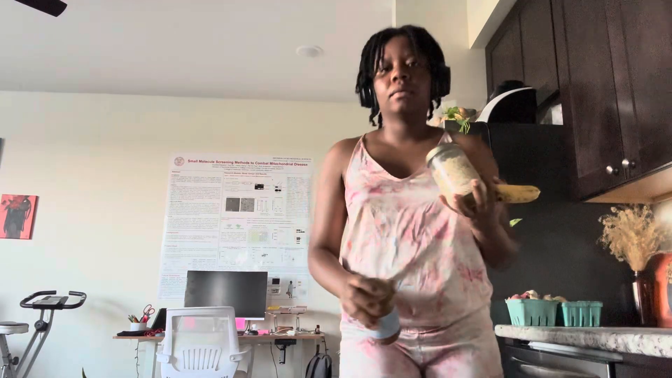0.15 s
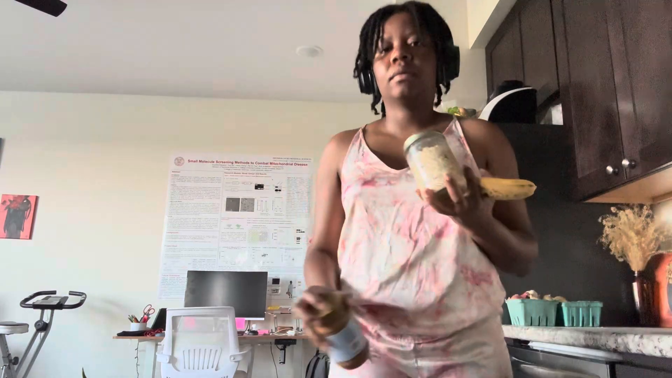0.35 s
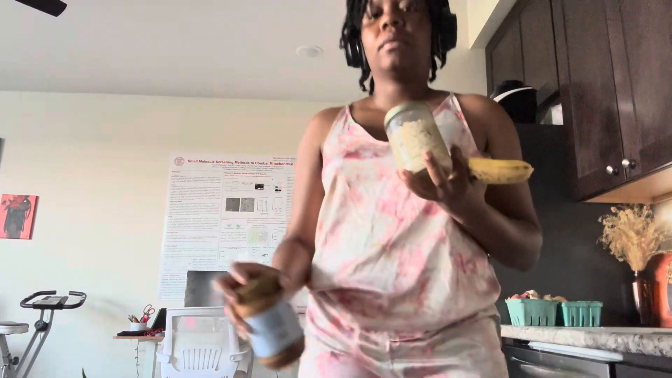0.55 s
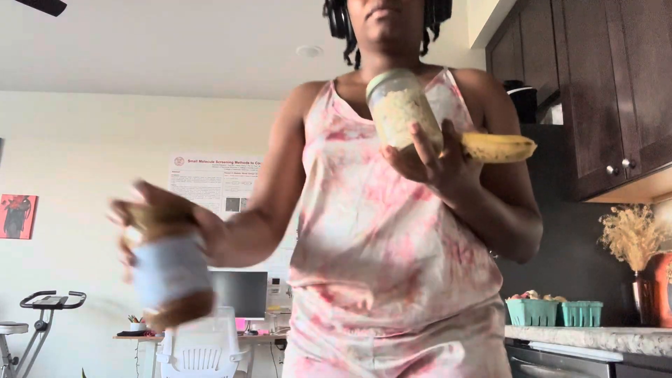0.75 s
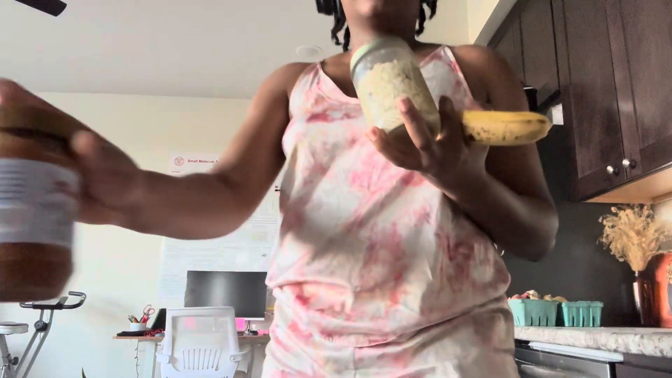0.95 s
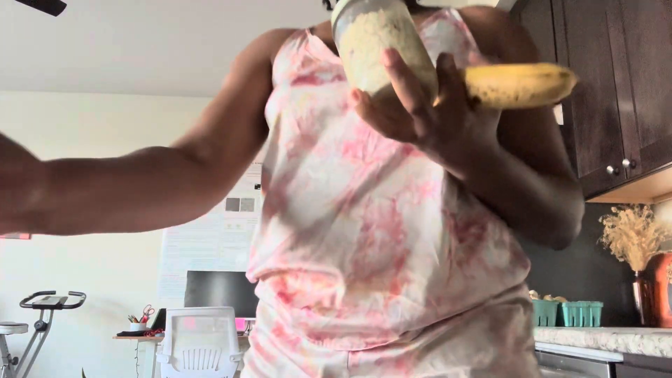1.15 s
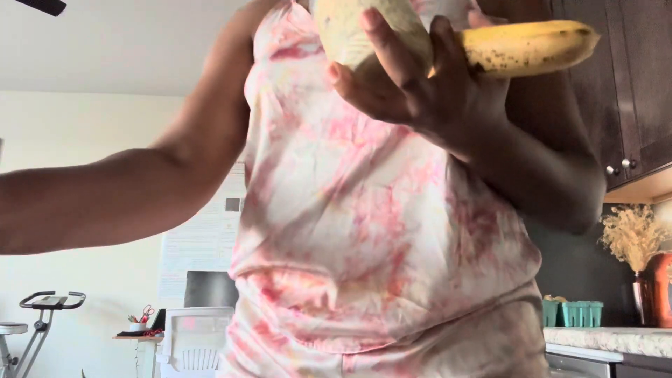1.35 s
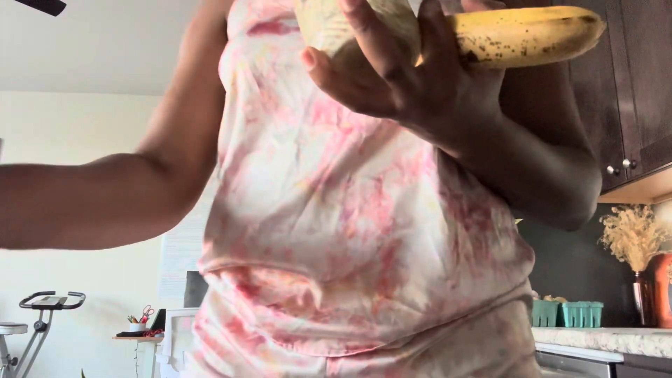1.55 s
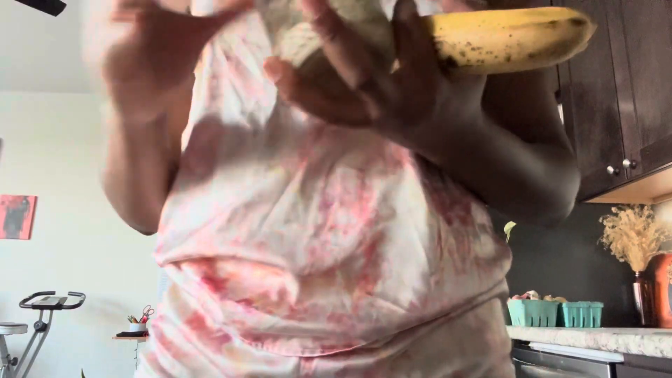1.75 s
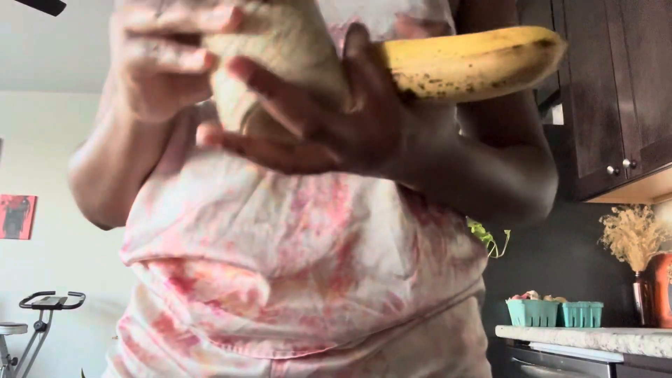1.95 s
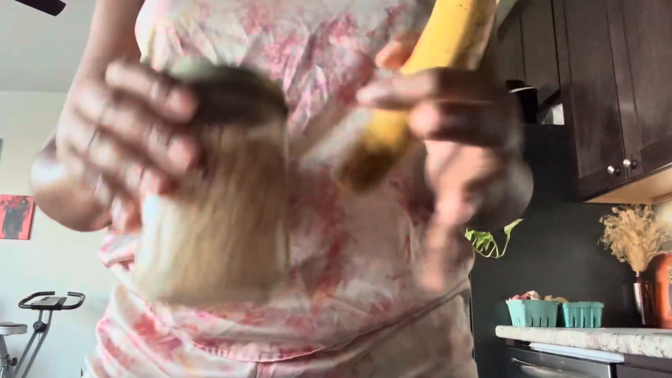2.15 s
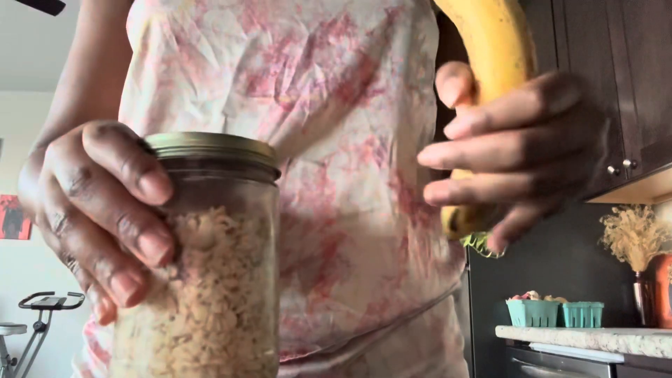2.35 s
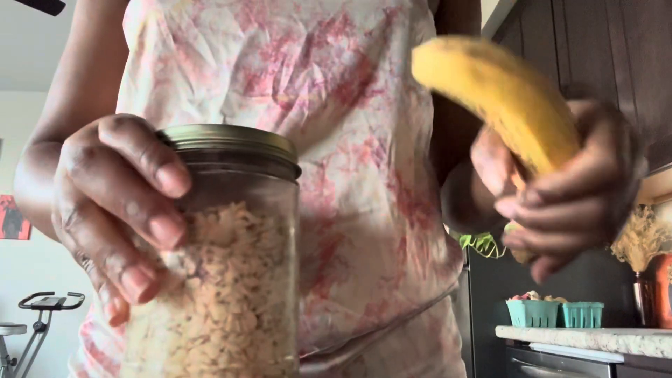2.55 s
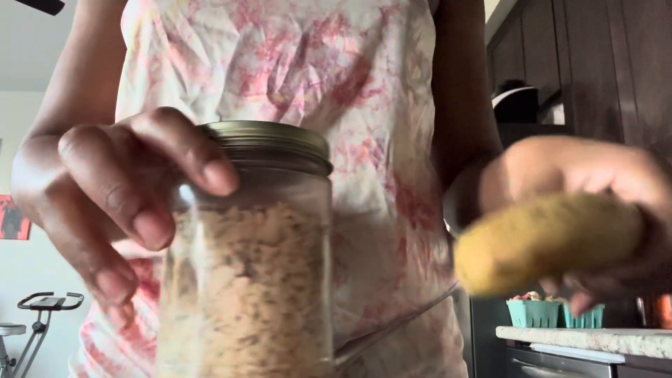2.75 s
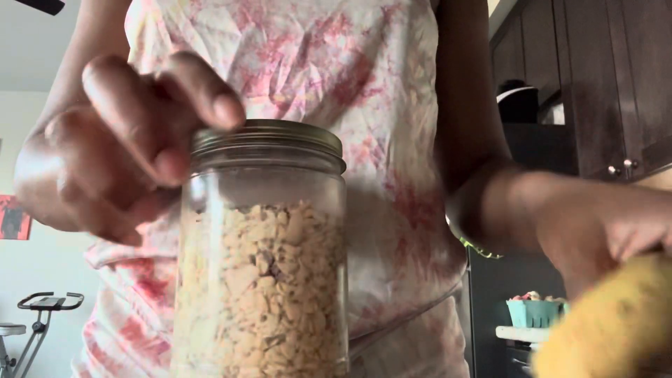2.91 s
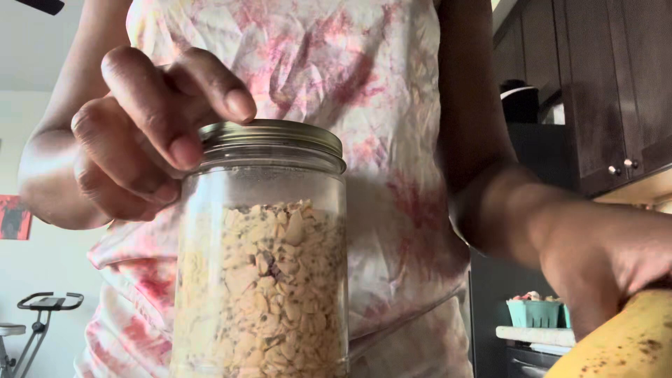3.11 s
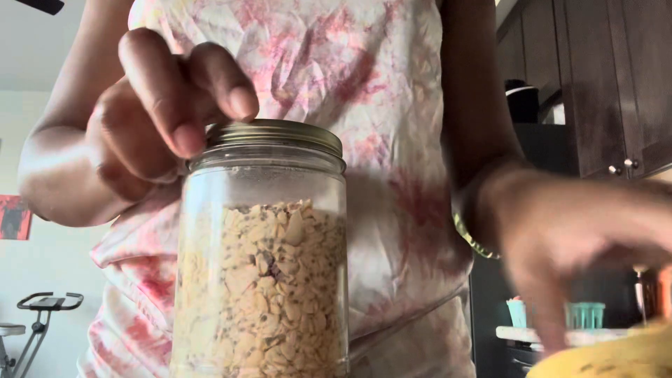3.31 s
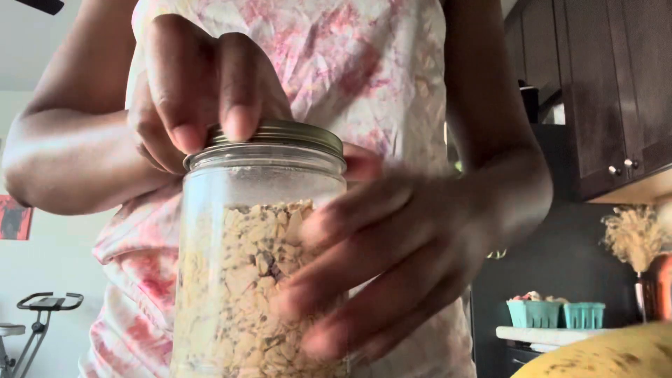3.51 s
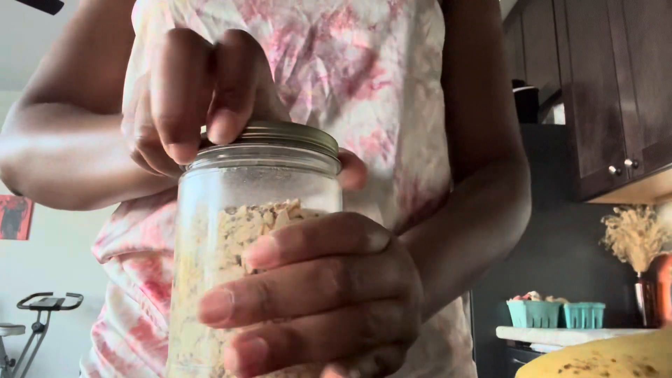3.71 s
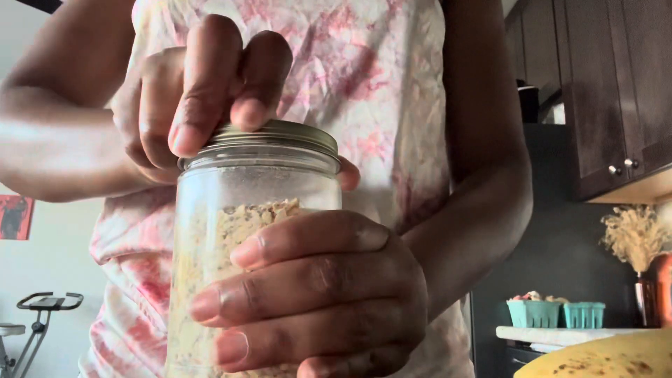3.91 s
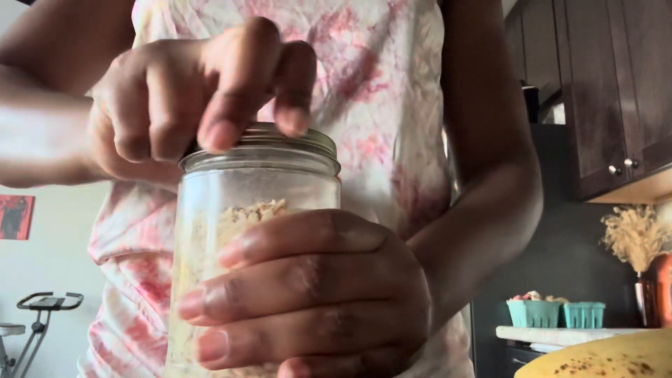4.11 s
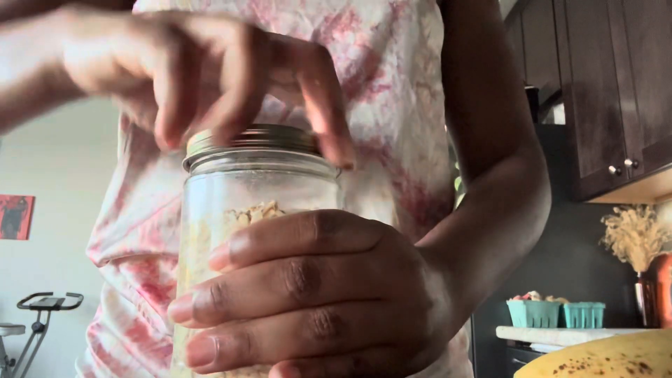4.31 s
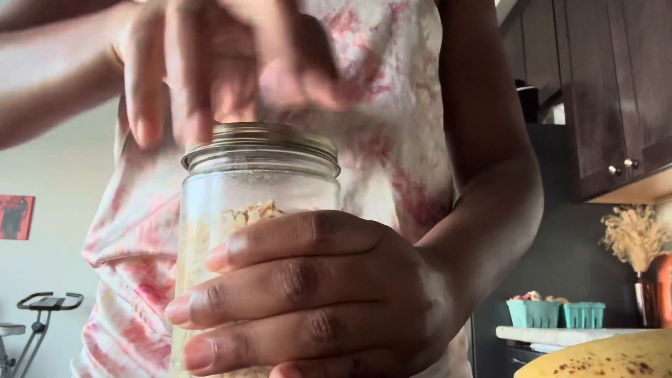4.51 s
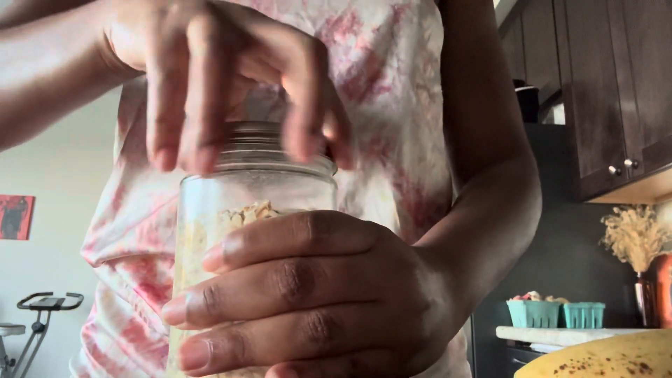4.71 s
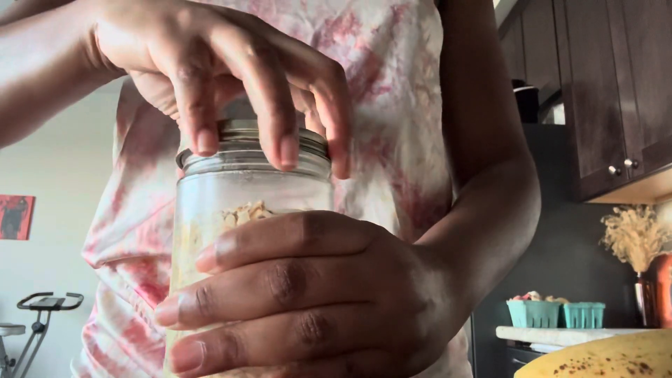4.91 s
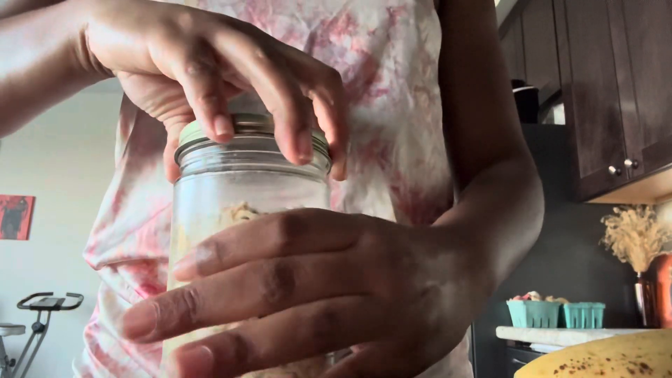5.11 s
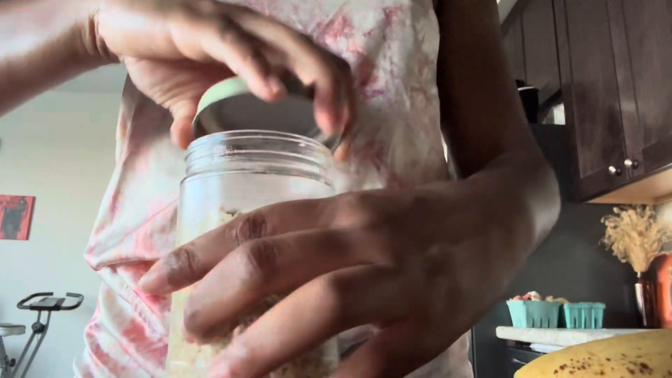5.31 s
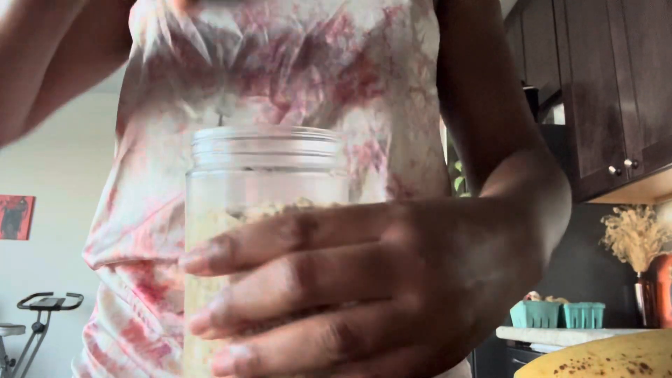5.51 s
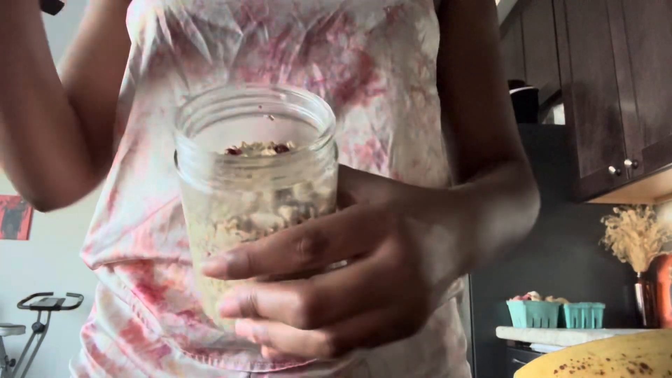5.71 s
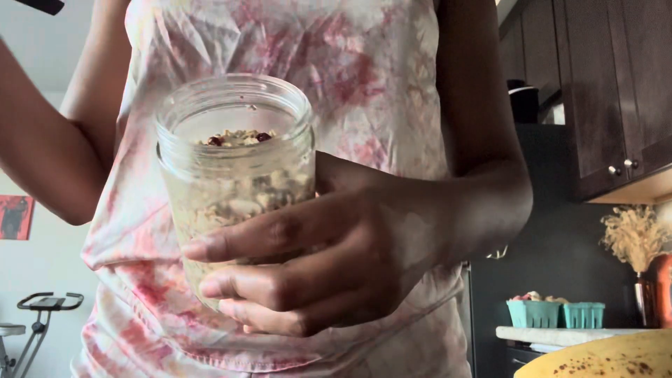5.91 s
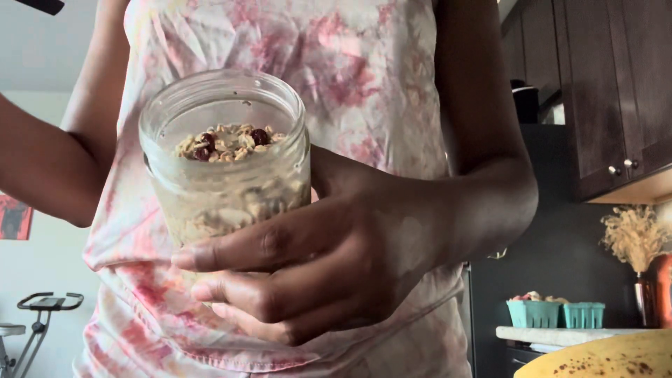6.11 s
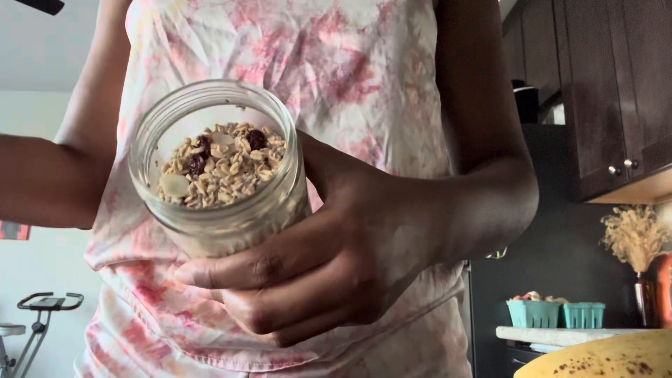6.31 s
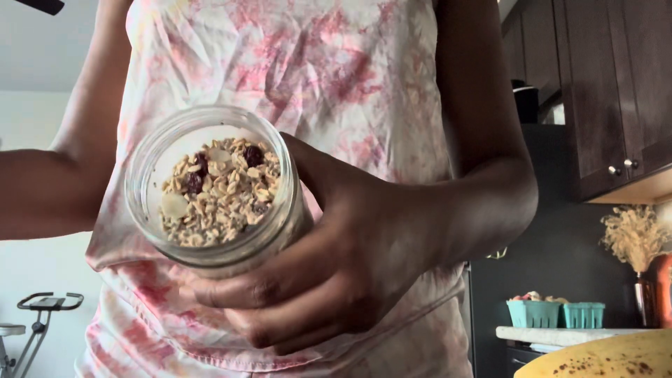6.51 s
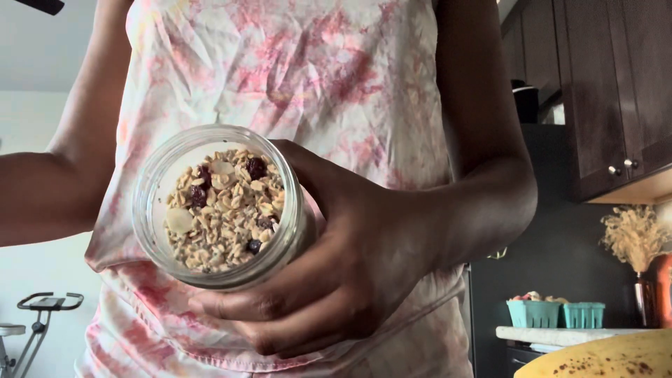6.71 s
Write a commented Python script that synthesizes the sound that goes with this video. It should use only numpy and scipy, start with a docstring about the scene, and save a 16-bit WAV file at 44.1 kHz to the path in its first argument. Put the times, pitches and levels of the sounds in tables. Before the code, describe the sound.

In a quiet, faintly humming kitchen, two jars are set down in turn and a metal screw lid grinds, squeaks and clacks free.

```python
"""A hum swells faintly in a quiet, rather live kitchen and clothes rustle; then two jars are set down on a table.
The full plastic jar lands with a thump and a thin rattle; the glass one rocks twice before it stands.
Fingers take hold of the glass jar's metal lid and twist it off in short pushes: random slips ring the lid
as a grinding thread, wavering tones squawk, and short bursts ring the lid and the glass as it clacks free.
Blows drive banks of resonances; cloth and air are shaped noise. A phone lying on the table hears it all."""
import sys
import numpy as np
from scipy import signal
from scipy.fft import rfft, irfft
from scipy.io import wavfile
from scipy.ndimage import uniform_filter1d, map_coordinates

SR = 44100
rng = np.random.default_rng(int(sys.argv[2]) if len(sys.argv) > 2 else 0)


def to_wav(sig):
    """Store sig (one row per channel, or 1-D mono) as 16-bit WAV at the path in sys.argv[1].

    Samples outside -1..1 are clipped; the rate is SR.
    """
    pcm = np.clip(np.atleast_2d(sig), -1, 1) * 32767
    pcm = np.round(pcm).astype(np.int16)
    wavfile.write(sys.argv[1], SR, pcm.T)  # frames by channels


N = 297675  # 6.75 s


# pushes of the fingers that turn the lid and draw it off:
# start_s, attack_s, hold_s, grind_db, rasp_db, rim_hiss_db
PUSHES = [(3.995, .008, .04, -36, -44, -58), (4.075, .025, .07, -37.5, -42, -53),
          (4.19, .045, .05, -27.5, -35, -53), (4.27, .015, .045, -32, -39, -46),
          (4.558, .018, .025, -37, -54, -56), (4.628, .014, .022, -29, -28.5, -40),
          (4.655, .02, .05, -26, -31, -46), (4.712, .02, .02, -28, -34, -38),
          (4.78, .02, .2, -46, -62, -72), (4.93, .03, .046, -34, -48, -62),
          (5.089, .015, .02, -36, -49, -58), (5.136, .02, .07, -32, -42, -52),
          (5.445, .02, .025, -40, -37.5, -70)]
# noise spectrum of the rim's hiss: frequency_hz, level_db (per Hz)
HISS = [(600, -28), (1500, -3), (2200, 1), (3400, -5), (5400, -5), (6600, -7), (9600, -0.5), (13600, -9),
        (14700, -42.5)]
# every push tires as it goes on: its level sags, then the thread stops
PUSH_SAG_DB, PUSH_RELEASE_S = 3, .03


def twisting(uneven_db=2.2):
    """Stick-slip in the thread drives the lid's low resonances, grit rasps on its upper ones, the rim hisses."""
    grind_gain, rasp_gain, hiss_gain = 0, 0, 0
    for s, attack_s, hold_s, grind_db, rasp_db, hiss_db in PUSHES:
        push = stroke(s, attack_s, hold_s, PUSH_RELEASE_S, PUSH_SAG_DB)
        # overlapping pushes add as powers
        grind_gain = np.hypot(grind_gain, undb(grind_db) * push)
        rasp_gain = np.hypot(rasp_gain, undb(rasp_db) * push)
        hiss_gain = np.hypot(hiss_gain, undb(hiss_db) * push)
    grip = undb(uneven_db * unit(soften(rng.standard_normal(N), 60)))

    low_slips = soften(scraped(rate=800, spread_db=3), 92, "high")
    grind = unit(soften(low_slips, 1090, order=3)) * grind_gain
    grit = soften(scraped(rate=1200, spread_db=3.8), 1050, "high", order=4)
    rasp = unit(soften(grit, 2700)) * rasp_gain
    hiss = unit(colour(grains(9000, 3.5), HISS)) * hiss_gain
    return grip * (grind + rasp) + hiss + squawks()


# the thread squawks where it sticks and slips fastest: start_s, hold_s, pitch_hz (slips a second), level_db
SQUAWKS = [(4.193, .04, 790, -24), (4.635, .045, 660, -23.5), (4.93, .035, 700, -34),
           (5.135, .05, 680, -33)]
# a squawk swells, then drops in pitch as the lid stalls; the share is the drop at full stall
SQUAWK_ATTACK_S, SQUAWK_RELEASE_S, SQUAWK_DROP_SHARE = .035, .04, .55


def squawks(width_hz=80):
    """The thread sticks and slips hundreds of times a second, in uneven fits, slowing as each turn stalls."""
    t, out = np.arange(N) / SR, 0
    for s, hold_s, hz, db in SQUAWKS:
        # the cube keeps the pitch nearly steady at first
        stall = np.clip((t - s) / (hold_s + SQUAWK_RELEASE_S), 0, 1) ** 3
        phase = 2 * np.pi * np.cumsum(hz * (1 - SQUAWK_DROP_SHARE * stall)) / SR
        # slow complex noise wanders in both strength and phase
        fits = soften(rng.standard_normal(N) + 1j * rng.standard_normal(N), width_hz)
        slips = np.sqrt(np.abs(fits)) * np.sin(phase + np.angle(fits))
        swell = stroke(s, SQUAWK_ATTACK_S, hold_s, SQUAWK_RELEASE_S)
        out = out + undb(db) * unit(slips) * swell
    return out


def scraped(rate, spread_db, bend_share=.028, bend_hz=12):
    """A stream of slips rings the lid; its tone changes as it loosens and wavers as the fingers bend it."""
    slips, loose = grains(rate, spread_db), looseness(np.arange(N) / SR)
    tight_ring = unit(ring(slips, lid_modes(0)))
    loose_ring = unit(ring(slips, lid_modes(1)))
    lid = (1 - loose) * tight_ring + loose * loose_ring
    # reading the sound at an uneven speed bends its pitch
    bend = bend_share * unit(soften(rng.standard_normal(N), bend_hz))
    return map_coordinates(lid, [np.cumsum(1 + bend)], mode="mirror")


# the metal lid's resonances: frequency_hz, width_hz, tight_level_db, loose_level_db
LID = [(345, 55, 1, 4.5), (460, 170, -1, 0), (583, 35, -2, 4), (636, 55, 1, 6), (697, 45, -1, 1),
       (790, 45, 6, 1), (900, 120, -3, -7), (1110, 130, -6, -7), (1350, 220, -12, -9),
       (1910, 240, -13, -15), (2270, 160, -18, -14), (2765, 220, -25, -17), (4250, 500, -37, -32)]


def lid_modes(loose):
    """The lid's resonances, from tight on the thread (0) to loose (1)."""
    return [(hz, width, tight_db + loose * (loose_db - tight_db)) for hz, width, tight_db, loose_db in LID]


# the thread lets go between these times: start_s, end_s
LOOSENS_S = [4.25, 4.62]


def looseness(s):
    """How far the lid has come loose at time s, 0 to 1."""
    return np.interp(s, LOOSENS_S, [0, 1])


# the lid jolting on the glass thread: start_s, ring_db, contact_cutoff_hz, glass_clack_db, table_thump_db
JOLTS = [(3.986, -28.5, 1480, -33, -35), (4.193, -26.5, 1100, -55, -52), (4.217, -25.5, 1200, -52, -55),
         (4.271, -33, 1200, -46, -46), (4.311, -27, 900, -35, -40), (4.562, -31.5, 750, -60, -35.5),
         (4.625, -33, 2000, -39, -41), (4.653, -18.5, 800, -49, -56), (4.690, -27, 800, -47, -47),
         (4.765, -30, 1000, -55, -51), (4.976, -30, 500, -54, -43), (5.01, -36, 600, -51, -41),
         (5.156, -32, 1400, -38, -60), (5.164, -20.5, 550, -22.5, -26), (5.195, -30, 905, -54, -55),
         (5.261, -28, 700, -30, -31)]
# the glass jar's resonances: frequency_hz, width_hz, level_db
JAR = [(330, 55, 8.5), (470, 110, 5), (614, 80, 6), (824, 90, 0), (1040, 110, 2), (1340, 140, -3),
       (1735, 100, 1), (2080, 160, -3), (2320, 130, -1), (2605, 100, -6), (2850, 140, -4), (3280, 160, -6),
       (4130, 300, -8), (5200, 900, -17), (9540, 4300, -24)]


def jolts(lid_damping=1.7, glass_damping=1.3):
    """The lid catches and jumps: it rings under the fingers, clacks on the glass and shakes the table."""
    out = np.zeros((2, N))
    for s, db, cutoff_hz, clack_db, thump_db in JOLTS:
        lid_body = touched(lid_modes(looseness(s)), scatter_db=3, damping=lid_damping)
        lid = loud(ring(contact(cutoff_hz, push=1.5, fade_ms=6), lid_body), db)
        glass_body = touched(JAR, scatter_db=3, damping=glass_damping)
        glass = struck(glass_body, 3800, push=0.7, crunch_ms=3.2, db=clack_db)
        add(out, s, soften(lid, 140, "high") + glass + thump(thump_db))
    return out


# the full plastic jar put down: clack_db, contact_cutoff_hz, table_thump_db, left_minus_right_db
SET_DOWN = (-20.5, 5500, -14.3, 3)
SET_DOWN_S = 1.28
# the plastic jar's resonances: frequency_hz, width_hz, level_db
PLASTIC = [(305, 65, 15), (455, 90, 11), (530, 70, 15), (850, 110, 3), (1190, 160, 1), (1730, 200, -6),
           (2100, 400, -9), (2850, 500, -7.5), (3780, 300, -7), (4750, 450, -16)]
# the plastic jar rattles thinly as it settles: start_s, level_db
RATTLES = [(1.287, -55), (1.314, -54)]
# the rattle's resonances: frequency_hz, width_hz, level_db
RATTLE = [(4750, 500, 0), (5200, 600, -5)]
# the other side of the glass base follows its landing at once:
# start_s, clack_db, contact_cutoff_hz, table_thump_db
FAR_EDGE = (2.2645, -29, 2200, -30)
# hands meeting the jar and the table:
# start_s, clack_db, contact_cutoff_hz, table_thump_db, left_minus_right_db
KNOCKS = [(0.347, -67, 1800, -38, -3), (1.418, -58, 500, -36, 0), (2.843, -35.5, 480, -41, 3),
          (2.918, -53, 1800, -39, -6), (3.099, -50, 2000, -53, -3), (3.158, -48.5, 2800, -56, -5),
          (3.215, -49, 600, -31.5, -6.5), (3.269, -54, 2000, -48, -4), (3.281, -55, 600, -33, -4.5),
          (3.404, -48, 700, -29.5, -5), (3.609, -42, 1100, -43, 2.5), (3.672, -42, 1780, -44.5, 0),
          (3.745, -50, 387, -46, 0)]
# a footfall, heel then toe, sways the table through the floor: start_s, level_db
FOOTFALL = [(.35, -36), (.421, -44.5)]
# a thump sways the table's frame a moment later
SWAY_LAG_S = .008
# each kind of blow: modes, scatter_db, damping, push, crunch_ms, sway_db (against its thump)
PLASTIC_BLOW = (PLASTIC, 1, 1, .3, 8, -26)
GLASS_BLOW = (JAR, 2.5, 1.2, 1, 3.4, -16)
HAND_BLOW = (JAR, 4, 1.5, .5, 5.5, -11.5)


def knocks():
    """Each knock rings a jar and the table under it, and sways the frame."""
    out = np.zeros((2, N))
    blows = [(PLASTIC_BLOW, SET_DOWN_S, *SET_DOWN)]
    blows += [(GLASS_BLOW, *row, 0) for row in rocking() + [FAR_EDGE]]
    blows += [(HAND_BLOW, *row) for row in KNOCKS]
    for blow, s, db, cutoff_hz, thump_db, pan_db in blows:
        modes, scatter_db, damping, push, crunch_ms, sway_db = blow
        clack = struck(touched(modes, scatter_db, damping), cutoff_hz, push, crunch_ms, db)
        add(out, s, clack, pan_db, lag_ms_per_db=.05)
        add(out, s, thump(thump_db), pan_db, lag_ms_per_db=0.27)
        add(out, s + SWAY_LAG_S, sway(thump_db + sway_db))
    for s, db in RATTLES:
        add(out, s, loud(ring(burst(4), RATTLE), db))
    for s, db in FOOTFALL:
        add(out, s, sway(db))
    return out


# the glass jar lands: start_s, clack_db, contact_cutoff_hz, table_thump_db
LANDING = (2.2497, -16.8, 4368, -17.5)
# then it rocks: each return comes sooner, weaker and duller
ROCK_S, ROCK_GAP_SHARE = .1091, .918  # first gap, and each gap against the one before
ROCK_LOSS_DB, ROCK_CUTOFF_SHARE = 5.2, .56  # change at each return
ROCK_THUMP_DB = -8.5  # against the clack: only a part of the weight falls on the table


def rocking(count=3):
    """The glass jar lands and rocks to rest: rows of start_s, clack_db, contact_cutoff_hz, table_thump_db."""
    s, db, cutoff_hz, _ = LANDING
    rows = [LANDING]
    for k in range(count - 1):
        s = s + ROCK_S * ROCK_GAP_SHARE ** k
        db = db - ROCK_LOSS_DB
        cutoff_hz = cutoff_hz * ROCK_CUTOFF_SHARE
        rows.append((s, db, cutoff_hz, db + ROCK_THUMP_DB))
    return rows


CRACK_DB = -13  # the bare crunch of the contact, against the ring that follows


def struck(modes, cutoff_hz, push, crunch_ms, db):
    """A body's ring together with the dry crack of the contact."""
    body = loud(ring(contact(cutoff_hz, push, crunch_ms), modes), db)
    crack = soften(contact(cutoff_hz, 0, crunch_ms), 3200, order=1)
    crack = soften(soften(crack, 4700, order=3), 350, "high")
    return body + loud(crack, db + CRACK_DB)


# the table top's resonances: frequency_hz, width_hz, level_db
TABLE = [(61, 5.9, -8.5), (110.7, 16, 3), (127, 20, 1.5), (163.6, 20, 2), (226.7, 57, -7), (293.2, 19, -9)]


def thump(db, swell_ms=4):
    """The table top takes up the weight over a few milliseconds and booms."""
    t = np.arange(SR // 2) / SR * 1000 / swell_ms
    boom = ring(soften(signal.unit_impulse(len(t)), 700), TABLE) * (1 - np.exp(-t ** 2))
    return loud(soften(boom, 45, "high"), db)


# the table frame's resonances: frequency_hz, width_hz, level_db
FRAME = [(44, 16, -7.5), (63.6, 8, 0.5), (80, 13, -3)]


def sway(db):
    """The table's frame wobbles deeply after a soft shove."""
    return loud(soften(ring(contact(83, push=2, fade_ms=10), FRAME), 130), db)


# glass sliding on the table and under the palm: start_s, hold_s, level_db
SLIDES = [(2.5, .05, -48), (2.68, .1, -50)]
SLIDE_ATTACK_S, SLIDE_RELEASE_S, SLIDE_SAG_DB = .025, .025, 3
# a fingertip rubs on after it lands: level against its knock, and how long it takes to lift
RUB_DB, RUB_HOLD_S, RUB_RELEASE_S = -15, .02, .11


def rubbing():
    """Random slips ring the glass as it slides under the palm and as fingertips rub on after they land."""
    drag = 0
    for s, hold_s, db in SLIDES:
        drag = drag + undb(db) * stroke(s, SLIDE_ATTACK_S, hold_s, SLIDE_RELEASE_S, SLIDE_SAG_DB)
    out = unit(soften(ring(grains(1300, 2.3), JAR), 1700)) * drag
    skin = ring(grains(3000, 2), JAR)
    for s, db, cutoff_hz, _, _ in KNOCKS:
        # only firm contacts rub brightly
        rub = unit(soften(soften(skin, 3 * cutoff_hz), 1500, "high", order=1))
        out = out + rub * undb(db + RUB_DB) * stroke(s, .008, RUB_HOLD_S, RUB_RELEASE_S)
    return out


# arm movements that stir the cloth: start_s, hold_s, level_db
REACHES = [(.27, .31, -67.5), (1.18, .28, -66), (2.5, 2.9, -77), (2.55, .2, -69), (3.15, .35, -69),
           (5.49, .02, -72)]
REACH_ATTACK_S, REACH_RELEASE_S, CLOTH_REST_DB = .13, .12, -85
# noise spectrum of the cloth: frequency_hz, level_db (per Hz)
CLOTH = [(300, -6.5), (1000, 4), (2700, 5), (6500, -7), (9500, 2), (13500, -5), (15000, -22.5)]
# small crisp ticks of nails, cloth and cereal: start_s, level_db, fade_ms
TICKS = [(1.496, -58, 5), (1.724, -60.5, 5.4), (1.794, -65, 45), (2.816, -62, 15), (3.673, -43.5, 2.3),
         (3.835, -59.5, 6.7), (4.267, -53.5, 6), (5.2, -53, 2.6), (6.108, -72, 9.3)]
# noise spectrum of the ticks: frequency_hz, level_db (per Hz)
CRISP = [(600, -28.5), (2000, -6), (4000, -12.5), (9800, -1), (12500, -5), (15500, -28)]


def handling(swell=.6, flutter_db=2):
    """Cloth rustles in small fits as the arms move, with a sharper tick now and then."""
    motion = undb(CLOTH_REST_DB)
    for s, hold_s, db in REACHES:
        motion = np.hypot(motion, undb(db) * stroke(s, REACH_ATTACK_S, hold_s, REACH_RELEASE_S))
    folds = undb(flutter_db * unit(soften(rng.standard_normal(N), 25)))
    rustle = unit(folds * colour(grains(2500, 3.5), CLOTH)) * motion
    out = np.tile(rustle, (2, 1))
    for s, db, fade_ms in TICKS:
        # longer ticks start more gently; the padding leaves room for the spectrum's spread ahead of the tick
        tick = np.pad(burst(fade_ms, swell=swell), (64, 0))
        add(out, s, loud(soften(colour(tick, CRISP), 500, "high"), db))
    return out


# the kitchen's reverberation: frequency_hz, decay_s (fall of 60 dB), level_db
ROOM = [(58.26, 0.86, -3.5), (162, 0.68, -5.5), (404.6, 0.69, -8.5), (970, 0.56, -7.5), (2660, 0.58, -10.5),
        (6000, 0.43, -7.5), (12000, .42, -14)]


def kitchen(radiated, echo_s=.0145, echo_db=-21, build_s=0.0057):
    """A wall answers, and the room rings on, longest in the bass."""
    # unrelated tails left and right, each band fading at its own pace
    t = np.arange(int(1.3 * SR)) / SR
    f = np.maximum(np.fft.rfftfreq(len(t), 1 / SR), 1)
    places = np.log([row[0] for row in ROOM])
    source = radiated.mean(axis=0)
    wet = []
    for _ in range(2):
        noise, tail = rfft(rng.standard_normal(len(t))), 0
        for share, (hz, t60, db) in zip(np.eye(len(ROOM)), ROOM):
            # each band overlaps its neighbours in a triangle
            band = irfft(noise * np.interp(np.log(f), places, share), len(t))
            fade = np.exp(-np.log(1000) * t / t60) * (1 - np.exp(-(t / build_s) ** 2))
            tail = tail + undb(db) * band * fade / np.linalg.norm(fade)
        tail[int(echo_s * SR)] += undb(echo_db)
        wet.append(signal.fftconvolve(source, tail)[:N])
    return np.array(wet)


# the hum swells and fades: time_s, level_db
HUM = [(0, -80), (1.15, -54), (2.1, -57.5), (5.6, -59.5), (6.3, -77), (6.52, -53), (6.75, -53)]
HUM_HZ = 279.5
# noise spectrum of the room air: frequency_hz, level_db (per Hz)
AIR = [(15, -22), (28, -7), (240, -5), (260, 1.5), (297, -8), (340, -1), (433, -14.5), (614, -9),
       (1250, -27), (1800, -44), (15500, -55)]
AIR_DB = -55.5  # of each air noise, before its share in the stereo mix


def background():
    """Dull room air, partly shared by both sides, and an appliance's slightly wavering hum."""
    left, right, both = (unit(colour(rng.standard_normal(N), AIR)) for _ in range(3))
    air = undb(AIR_DB) * (0.37 * both + 0.89 * np.array([left, right]))
    waver_hz = 0.92 * unit(soften(rng.standard_normal(N), 1.2))
    phase = 2 * np.pi * np.cumsum(HUM_HZ + waver_hz) / SR
    hum = np.sqrt(2) * np.sin(phase) * curve(HUM)
    return air + hum


# how the two microphones differ:
# frequency_hz, left_minus_right_db, lid_lead_rad, table_lead_rad (left's phase lead)
PORTS = [(300, -.5, 0.1, 0.1), (630, -4, -.4, 2.3), (850, -2, -.3, 1.9), (1200, 1.5, -.1, .9),
         (1900, 2.2, -1.1, -.3), (5000, .5, -1.6, -.5), (10500, 0, .3, 0), (13800, 0, 2.2, 2)]


def ports(x, lead):
    """Close by, the two microphones hear each band at a different level and phase."""
    hz, balance_db, _, _ = np.transpose(PORTS)
    f = np.log(np.maximum(np.fft.rfftfreq(N, 1 / SR), 1))
    side = np.array([[1], [-1]]) / 2
    level = undb(side * np.interp(f, np.log(hz), balance_db))
    turn = np.exp(1j * side * np.interp(f, np.log(hz), lead))
    return irfft(rfft(x) * level * turn, N)


def suppress(x, threshold_db=-71, rest_share=.65):
    """The phone's noise suppressor turns the upper middle down whenever it is faint."""
    band = signal.sosfiltfilt(signal.butter(2, [1400, 7000], "band", fs=SR, output="sos"), x)
    power = uniform_filter1d(np.mean(band ** 2, axis=0), SR // 40)  # over 25 ms
    faint = 1 / (1 + (power / undb(threshold_db) ** 2) ** 2)
    return x - band * (1 - rest_share) * faint


def stroke(s, attack_s, hold_s, release_s, sag_db=0):
    """Gain of one movement: it swells up to time s, holds while sagging, and dies; both slopes take 20 dB."""
    age = np.arange(N) / SR - s
    away = np.maximum(-age, 0) / attack_s + np.maximum(age - hold_s, 0) / release_s
    return undb(-20 * np.minimum(away, 10) - sag_db * np.clip(age / hold_s, 0, 1))


def grains(rate, spread_db):
    """Tiny slips at random moments, so many a second on average, of uneven size."""
    sizes = undb(spread_db * np.clip(rng.standard_normal(N), -2, 2)) * rng.choice([-1, 1], N)
    return unit(sizes * (rng.random(N) < rate / SR))


def ring(x, modes):
    """Drive a body's resonances; neighbouring modes swing in opposite directions."""
    t = np.arange(int(SR * min(.5, 2 / min(row[1] for row in modes)))) / SR
    response = 0
    for k, (hz, width, db) in enumerate(modes):
        decay = width * np.exp(-np.pi * width * t)
        response = response + (-1) ** k * undb(db) * decay * np.cos(2 * np.pi * hz * t)
    return signal.fftconvolve(x, response)[:len(x)]


def touched(modes, scatter_db, damping=1):
    """Each touch lands elsewhere and favours other modes; a hand on the body widens them."""
    return [(hz, width * damping, db + scatter_db * rng.uniform(-1, 1)) for hz, width, db in modes]


def contact(cutoff_hz, push, fade_ms):
    """One push and the crunch of the surfaces settling; softer contact is duller."""
    return soften(burst(fade_ms, push), cutoff_hz)


def burst(fade_ms, push=0, swell=0):
    """A push, then noise that may swell and dies away; unit energy, spread nearly evenly over frequency."""
    age = np.arange(SR // 2) / SR * 1000 / fade_ms
    x = rng.standard_normal(len(age)) * age ** abs(swell) * np.exp(-age)
    x = x / np.linalg.norm(x)
    x[0] += push
    for _ in range(6):
        # flatten the spectrum, then keep the burst short
        flat = irfft(np.exp(1j * np.angle(rfft(x))), len(x))
        x = flat * np.exp(-(age / 5) ** 4)
    return x / np.linalg.norm(x)


def add(out, s, x, pan_db=0, lag_ms_per_db=0):
    """Place a sound in time; off to one side it reaches the nearer microphone louder and sooner."""
    for channel, side in enumerate([1, -1]):
        lag_s = max(0, -side * pan_db) * lag_ms_per_db / 1000
        i = int((s + lag_s) * SR)
        out[channel, i:i + len(x)] += undb(side * pan_db / 2) * x[:N - i]


def loud(x, db):
    """Set a blow's rms level over its first 35 ms."""
    return x * undb(db) / np.sqrt(np.mean(x[:int(.035 * SR)] ** 2))


def colour(x, points):
    """Shape a sound by a spectrum of frequency_hz, level_db."""
    hz, db = np.transpose(points)
    f = np.maximum(np.fft.rfftfreq(len(x), 1 / SR), 1)
    return irfft(rfft(x) * undb(np.interp(np.log(f), np.log(hz), db)), len(x))


def soften(x, hz, kind="low", order=2):
    """Low-pass or high-pass."""
    return signal.sosfilt(signal.butter(order, min(hz, SR / 2 - 1000), kind, fs=SR, output="sos"), x)


def curve(rows):
    """Gain over time from rows of time_s, level_db; silent outside the rows."""
    rows = np.array(rows)
    return undb(np.interp(np.arange(N) / SR, rows[:, 0], rows[:, 1], left=-150, right=-150))


def unit(x):
    """Scale to rms 1."""
    return x / np.sqrt(np.mean(x ** 2))


def undb(db):
    """Decibels to gain."""
    return 10 ** (np.asarray(db) / 20)


LID_ROOM_DB = -3.7  # the lid is close by, so less of the room is heard with it


def scene():
    """Everything at the table, heard in the kitchen."""
    lid = jolts() + twisting()
    table = knocks() + rubbing() + handling()
    _, _, lid_lead, table_lead = np.transpose(PORTS)
    close = ports(table, table_lead) + ports(lid, lid_lead)
    return close + kitchen(table + undb(LID_ROOM_DB) * lid) + background()


def record(dry):
    """The phone suppresses faint noise, holds peaks at full scale and cuts the top."""
    held = np.clip(suppress(dry), -1, 1)
    steep_cut = signal.ellip(8, .2, 70, 15500, fs=SR, output="sos")
    return signal.sosfilt(steep_cut, soften(held, 14400, order=4))


dry = scene()
out = record(dry)
to_wav(out)
```